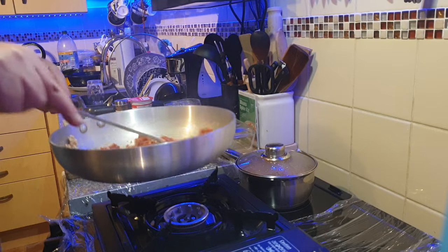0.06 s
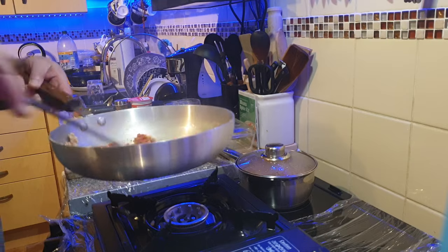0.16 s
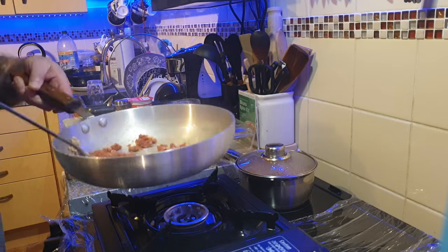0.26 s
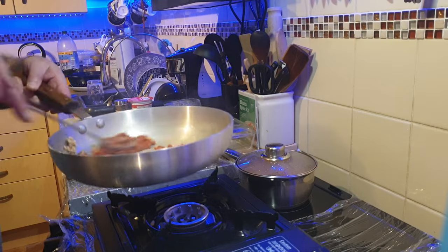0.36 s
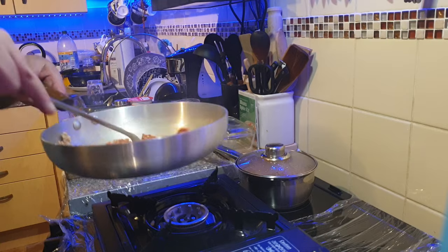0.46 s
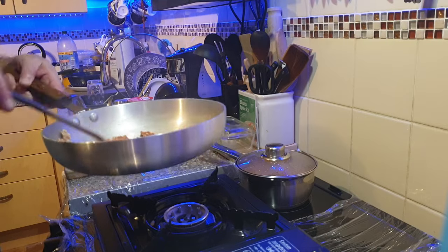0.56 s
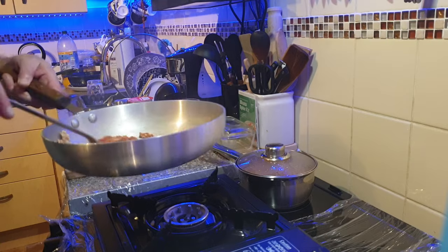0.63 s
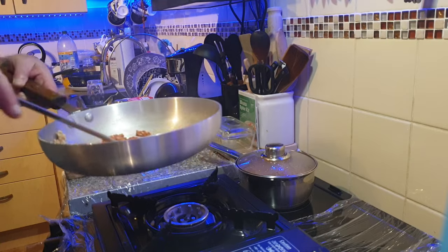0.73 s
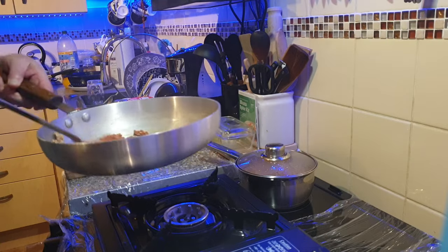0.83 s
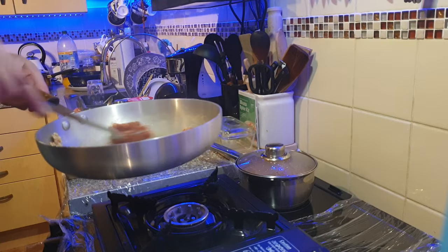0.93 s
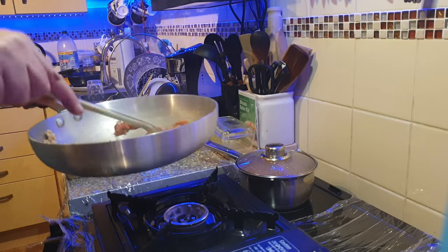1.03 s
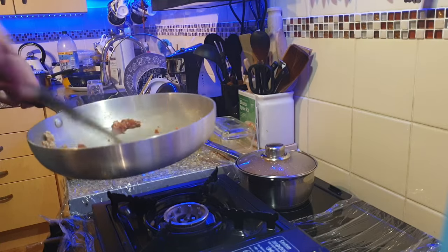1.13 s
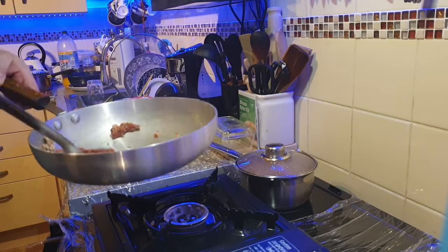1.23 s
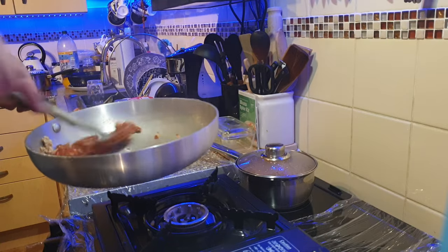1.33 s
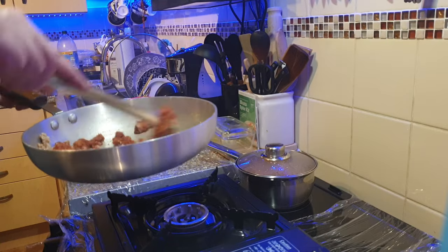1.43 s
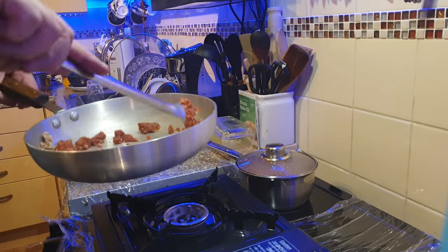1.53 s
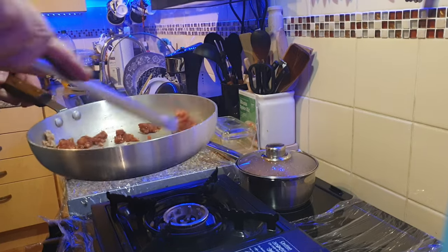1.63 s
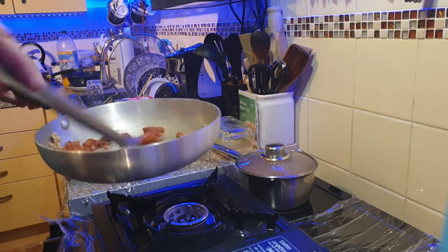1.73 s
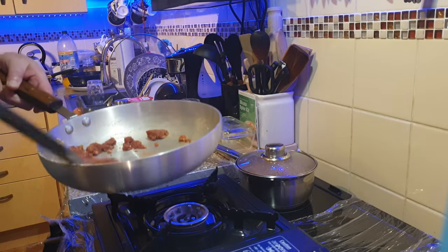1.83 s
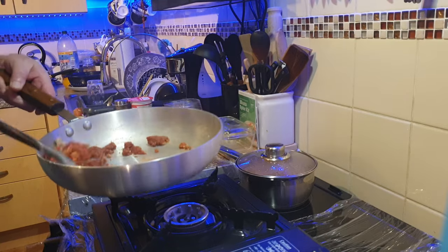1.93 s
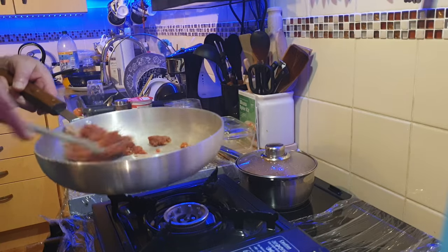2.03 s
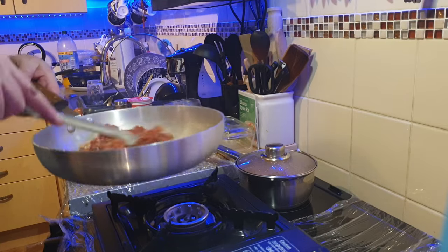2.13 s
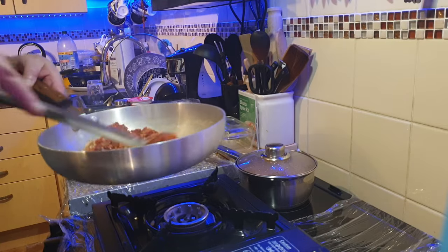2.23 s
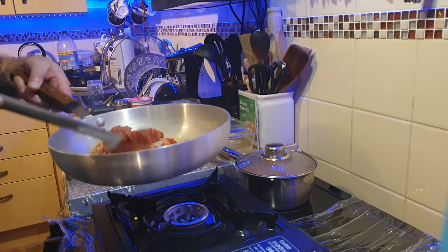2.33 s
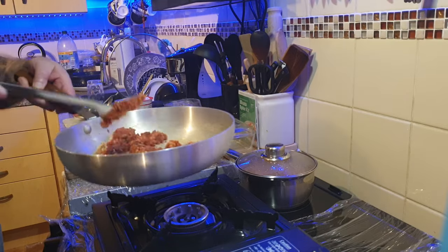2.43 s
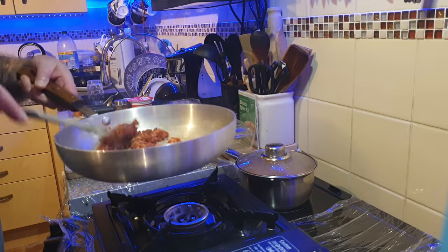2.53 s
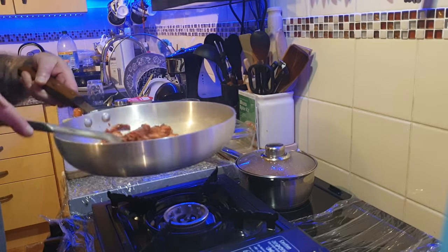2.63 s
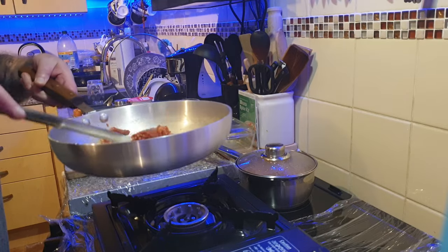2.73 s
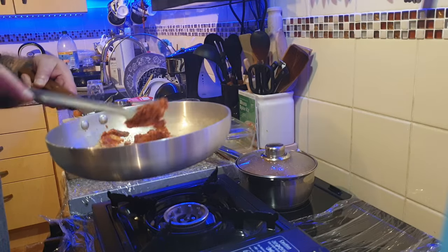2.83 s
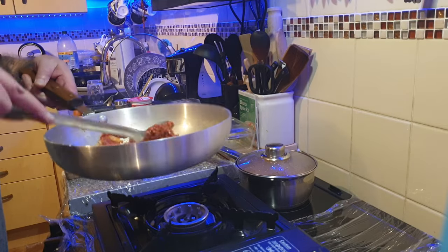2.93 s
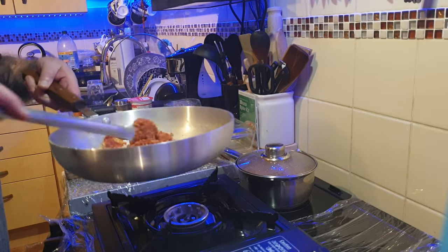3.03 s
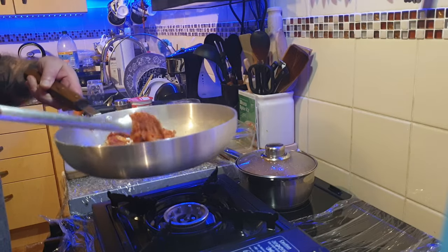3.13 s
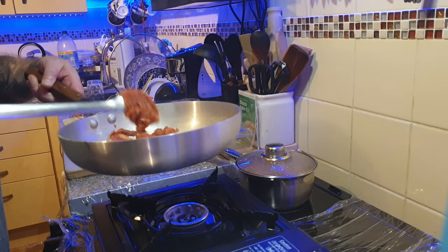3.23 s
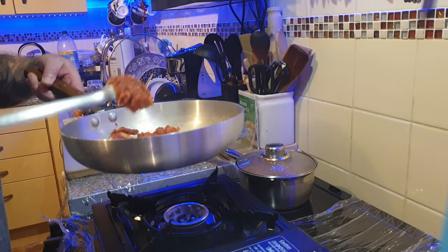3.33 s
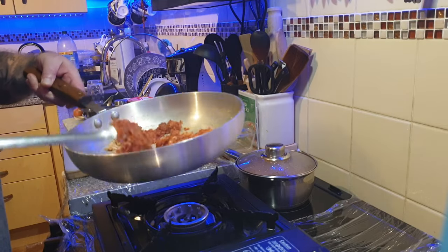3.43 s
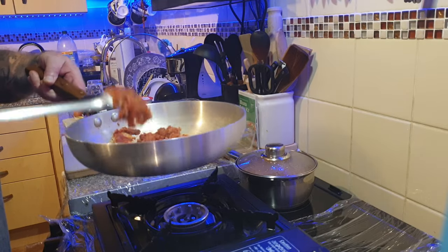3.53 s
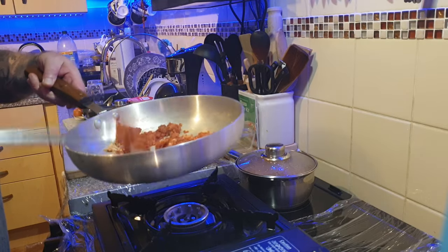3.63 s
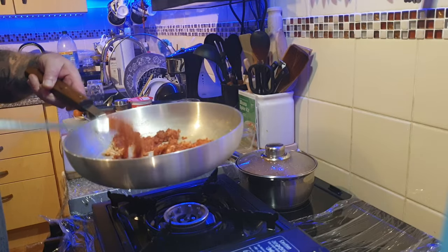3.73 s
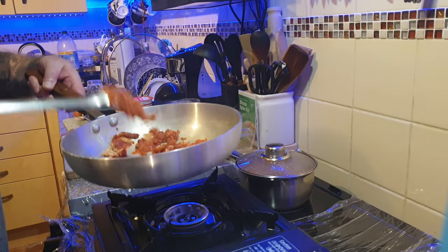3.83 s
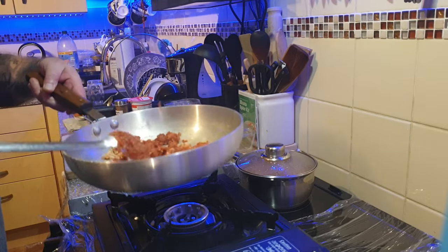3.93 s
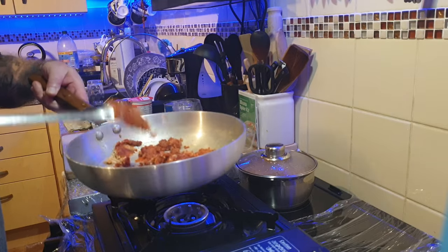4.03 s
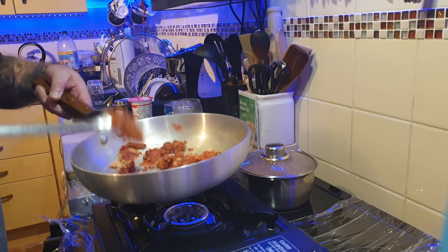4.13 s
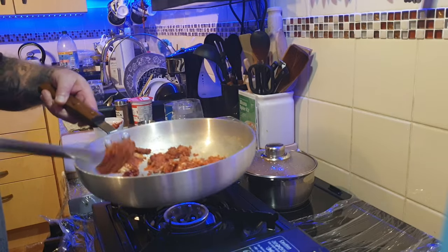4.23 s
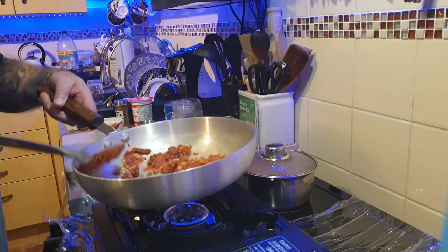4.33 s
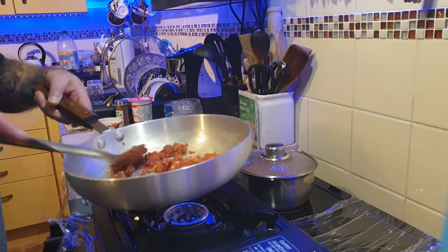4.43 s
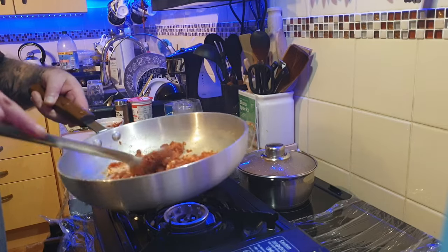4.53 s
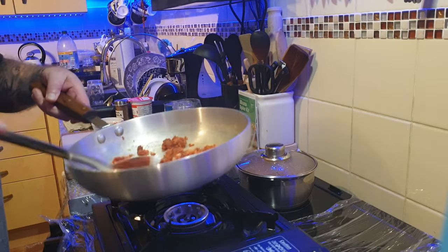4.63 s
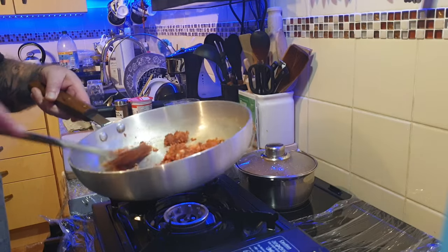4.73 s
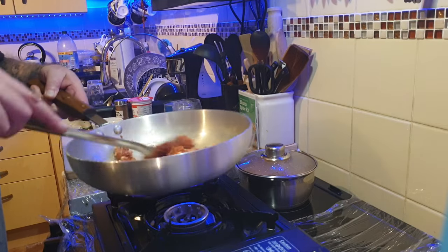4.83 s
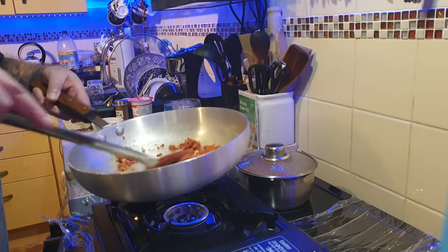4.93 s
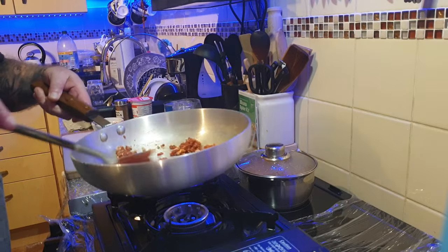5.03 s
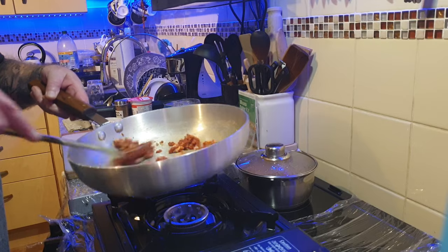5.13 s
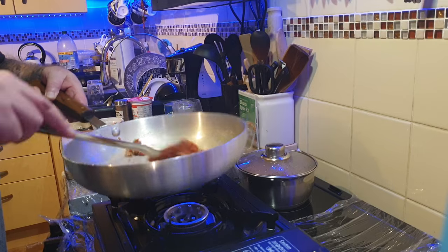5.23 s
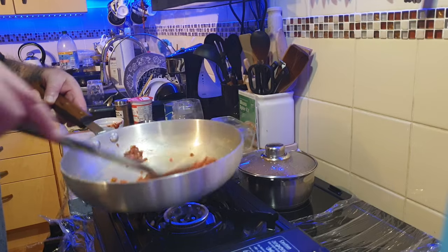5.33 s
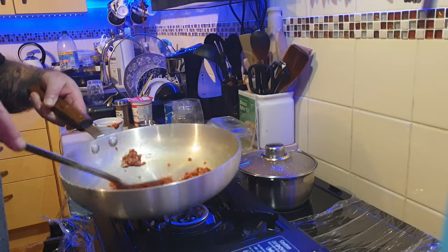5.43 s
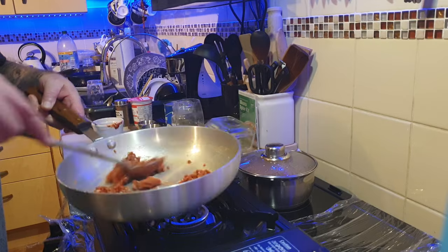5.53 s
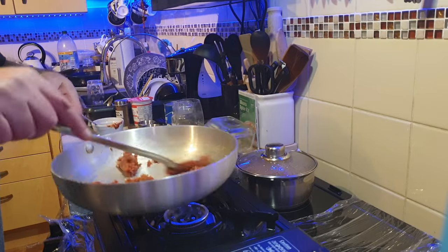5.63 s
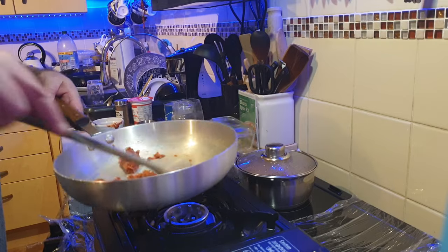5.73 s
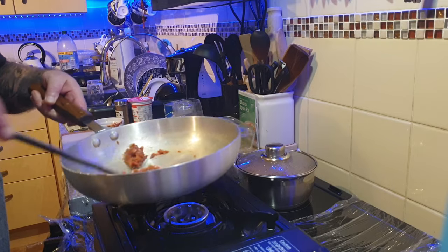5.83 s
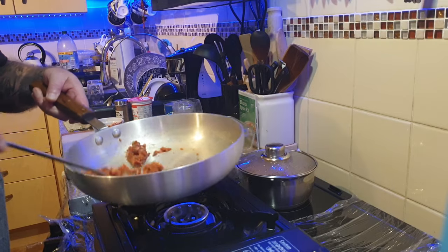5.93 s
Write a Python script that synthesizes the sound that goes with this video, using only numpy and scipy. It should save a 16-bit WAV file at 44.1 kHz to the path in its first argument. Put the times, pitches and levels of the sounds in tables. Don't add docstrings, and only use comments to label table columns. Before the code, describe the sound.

In a small tiled kitchen, paste sizzles finely in a metal pan above a softly roaring gas burner. A metal spoon scrapes and lightly clinks. Past the middle, three sharp ringing raps hit the rim, the loudest events; afterwards the background drops and stirring resumes more faintly. Close stereo microphone with short tile reflections.

```python
import sys
import numpy as np
from scipy import signal
from scipy.fft import rfft, irfft, next_fast_len
from scipy.io import wavfile
from scipy.ndimage import uniform_filter1d

SR = 44100
rng = np.random.default_rng(int(sys.argv[2]) if len(sys.argv) > 2 else 0)


def dump_mix(stems):
    frames = np.atleast_2d(stems).T
    limited = np.clip(frames, -1, 1)
    pcm = np.round(limited * 32767).astype(np.int16)
    wavfile.write(sys.argv[1], SR, pcm)


def elevation(decibels):
    levels = np.asarray(decibels, float)
    return 10 ** (levels / 20)


N = 263277
LEFT_LEAD = 4

MODE_HZ = np.array([285, 752, 840, 947, 1478, 1515, 1845, 2388, 2487, 2680, 2840, 2950, 3230, 3732, 3865, 3989, 4400, 4770, 5195, 5360, 5718, 5922, 6520, 6655, 7490, 8638, 8830, 9127, 10270, 11705])
# (first rap [dB], second rap [dB], third rap [dB])
MODE_DB = [(-15, -49, -47), (-20, -12, -13), (-9, -9, -11.5), (-32, -17, -20), (-7, -10, -8.5),
           (-4, -16, -22), (-9, -32, -25), (-36, -11, -3.5), (-6, -20, -25), (-12, -24, -11),
           (-3.5, -13, -11), (-19, -5.5, -20), (-22, -9, -29), (-25, -27, -9), (-16, -17, -13),
           (-32, -11, -13), (-31, -17, -32), (-9, -8, -10), (-15, -15, -23), (-1, -2, -13), (-23, -19, -7),
           (-15, -4, -8.5), (-8, -11, -16), (-16, -23, -5), (-27, -4.5, -5), (1, -28, -27), (-11, -20, -25),
           (1, -48, -25), (-26, -10, -5), (-28, -22, -11)]


def evened(x):
    return x / np.sqrt(np.mean(x ** 2) + 1e-20)


def read(points, hz):
    f, value = np.transpose(points)
    return np.interp(np.log(hz + 1), np.log(f + 1), value)


def follow(curve):
    s, level = np.transpose(curve)
    return np.interp(np.arange(N) / SR, s, level)


def add(mix, s, sound):
    part = mix[:, round(s * SR):][:, :sound.shape[1]]
    part += sound[:, :part.shape[1]]


def resonate(x, hz, width):
    radius = np.exp(-np.pi * width / SR)
    angle = 2 * np.pi * hz / SR
    poles = [1, -2 * radius * np.cos(angle), radius * radius]
    return signal.lfilter([1 - radius], poles, x) * 2 * np.sin(angle)


def noise(colour, count, size, patchy_db, flicker_db):
    # (frequency [Hz], coherence [-1 to 1])
    likeness = [(60, 0.91), (130, 0.95), (290, 0.79), (640, 0.82), (1410, 0.017), (3100, -0.31),
                (6820, 0.22), (15000, -0.029)]
    frames, hz = count * 4 // size + 5, np.fft.rfftfreq(size, 1 / SR)
    a, b, c, d, patches = rng.standard_normal((frames, len(hz), 5)).T
    patches = uniform_filter1d(patches, size // 64, 0)
    patches = evened(uniform_filter1d(patches, 8192 // size, 1))
    flicker = evened(uniform_filter1d(rng.standard_normal(frames), 3))
    same = np.clip(read(likeness, hz), -1, 1)[:, None]
    left, other = a + 1j * b, c + 1j * d
    z = np.array([left, same * left + np.sqrt(1 - same ** 2) * other])
    z *= elevation(read(colour, hz)[:, None] + patchy_db * patches + flicker_db * flicker)
    return evened(signal.istft(z, nperseg=size, noverlap=size * 3 // 4)[1][:, :count])


def ring(hz, db, t60, rise):
    t = np.arange(round(SR * min(np.max(t60), 1 / 4))) / SR
    chance = rng.random((len(hz), 4, 1))
    hz, db, t60 = (np.asarray(v)[:, None, None] for v in (hz, db, t60))
    turn = np.minimum(hz / 1500, 1) * np.sign(chance[:, 1:2] - .5) / 4
    phase = chance[:, :1] + np.array([[0], [1]]) * (hz * LEFT_LEAD / SR + turn)
    beat = 1 + .5 * np.cos(2 * np.pi * (0.011 * hz * chance[:, 2:3] * t + chance[:, 2:]))
    modes = elevation(db - 60 * t / t60) * beat * np.sin(2 * np.pi * (hz * t + phase))
    return modes.sum(0) * (1 - np.exp(-t / rise))


def burst(colour, t60, rise):
    t = np.arange(round(SR / 3)) / SR
    clatter = noise(colour, len(t), size=1024, patchy_db=1.5, flicker_db=0)
    return clatter * elevation(-60 * t / t60) * (1 - np.exp(-t / rise))


def clustered(colour, width, depth_db):
    hz = np.geomspace(100, 16000, num=400)
    apart = np.abs(hz[:, None] - MODE_HZ).min(1) / (width * hz)
    dip_db = depth_db * (1 - np.exp(-apart ** 2)) * (hz > 2000) * (hz < 12500)
    return np.c_[hz, read(colour, hz) - dip_db]


def fridge_hum():
    # (start frequency [Hz], end frequency [Hz], level [dB])
    tones = [(100, 100, -59), (346.1, 349.7, -56.5)]
    hum = np.zeros(N)
    for hz, end_hz, db in tones:
        turns = np.cumsum(np.linspace(hz, end_hz, N)) / SR
        hum += elevation(db + 5.5) * np.sin(2 * np.pi * turns)
    return hum


def burner():
    # (frequency [Hz], density [dB per Hz])
    roar_colour = [(20, -56), (40, -34), (64, -2), (90, -6), (112, 3), (170, -10), (215, -6.5), (272, -1),
                   (295, -5), (312, -42), (340, -9), (400, 1), (500, -8), (650, -21), (900, -50)]
    # (frequency [Hz], density [dB per Hz])
    gas_colour = [(320, -29), (550, -4.5), (826, 4.5), (913, -1), (1700, -2.5), (2020, -4.5), (2160, -11),
                  (2350, -8.5), (2970, 3.5), (3500, -10.5), (4000, -14), (5200, -32), (8800, -120)]
    roar = elevation(-51) * noise(roar_colour, N, size=4096, patchy_db=1.5, flicker_db=-0.5)
    gas = elevation(-54.5) * noise(gas_colour, N, size=1024, patchy_db=0.2, flicker_db=0.1)
    return roar + gas


def strokes():
    # (most pressure [s], release [s], pressure [dB], place [0 = flat bottom to 1 = wall])
    spoon_strokes = [(0.005, 0.06, -35, 0.26), (0.05, .05, -32.5, .55), (0.25, 0.098, -40, .45),
                     (0.44, 0.13, -34, 0.74), (0.51, .04, -40, .95), (0.54, .04, -37, .1),
                     (0.62, .08, -36, 0.66), (0.99, 0.12, -40.5, 1), (1.055, 0.08, -33, .1),
                     (1.2, 0.061, -39, 0.5), (1.32, 0.12, -33, 0.18), (1.7, 0.058, -30.5, .05),
                     (1.74, 0.08, -38.5, 1.0), (1.79, .04, -33, .05), (1.865, 0.072, -26, 0.28),
                     (2.21, 0.067, -41, 0.74), (2.25, 0.11, -34.5, .05), (2.27, 0.053, -35.5, 0.66),
                     (2.691, 0.039, -27.5, 0.77), (2.76, 0.06, -29, 0.23), (3.1, 0.18, -38.5, 0.84),
                     (4.138, 0.083, -39, 0.76), (4.477, 0.022, -22.5, 1.0), (4.585, 0.077, -33, 1.0),
                     (4.735, 0.067, -26, 0.52), (4.947, 0.057, -31, 0.74), (5.193, .04, -35, 0.87),
                     (5.283, 0.14, -34, 0.23), (5.545, 0.13, -29.5, 0.36), (5.699, 0.075, -32.5, .2)]
    groups_db = [-12.5, -10, 2.5]
    idle_db = [-64.5, -75, -46]
    press_share, lift_db = 1.36, 19
    off_place_db = 19
    t = np.arange(0, N + 64, 64) / SR
    s, release, db, place = np.transpose(spoon_strokes)[:, :, None]
    away = np.maximum((t - s) / release, (s - t) / (press_share * release))
    felt = []
    for k, (group_db, rest_db) in enumerate(zip(groups_db, idle_db)):
        stroke_db = db + group_db - off_place_db * abs(place - k / 2) - lift_db * away
        power = elevation(rest_db) ** 2 + (elevation(stroke_db) ** 2).sum(0)
        felt.append(np.interp(np.arange(N) / SR, t, np.sqrt(power)))
    return felt


def sizzle():
    # (time [s], level [dB])
    frying = [(0.0, -30), (0.24, -35), (0.32, -31.5), (0.83, -36.5), (0.94, -34), (1.18, -36.5),
              (1.38, -33), (1.52, -37), (1.96, -33.5), (2.12, -34), (2.27, -40.5), (2.39, -37.5),
              (3.41, -38.5), (4.38, -38.5), (4.7, -36), (5.08, -39), (5.47, -35.5), (5.97, -38)]
    # (frequency [Hz], density [dB per Hz])
    fizz_colour = [(290, -44), (500, -24), (648, -16.5), (760, -17), (971, -17), (2000, -11), (2150, -18.5),
                   (2340, -9), (3820, -10), (6420, -4), (8090, -6), (10800, 0.5), (15700, -1.5)]
    stir_db = -2
    pop_size = elevation(2.5 * np.minimum(rng.exponential(1, (2, N)), 5))
    pops = pop_size * (rng.random((2, N)) < 500 / SR)
    grain = signal.lfilter([1], [1, -.95], pops, axis=1)
    fizz = noise(fizz_colour, N, size=512, patchy_db=1.0, flicker_db=.3) * (1 + .15 * grain)
    return np.hypot(elevation(follow(frying) + 5.0), elevation(stir_db) * strokes()[2]) * evened(fizz)


def scraping():
    # (frequency [Hz], width [Hz], level [dB])
    rubbed = [(757, 27, -10), (848.6, 18, -2), (1552, 83, 3.5), (1780, 34, -1.5), (2389, 47, -2.5),
              (2840, 29, -4), (3520, 56, -1), (3745, 62, -1), (4840, 94, -6), (5340, 51, -1.5),
              (5700, 10, 2), (5870, 41, 0), (6343, 51, 7.5), (6590, 11, -0.5), (7400, 26, -32),
              (7300, 42, -40), (8140, 58, -6), (8780, 140, -1)]
    unevenness = evened(uniform_filter1d(rng.standard_normal(N), 300))
    jerks = rng.standard_normal((2, N)) * elevation(2.5 * unevenness)
    jerks[1] = .8 * jerks[0] + .6 * jerks[1]
    groups = np.zeros((3, 2, N))
    for hz, width, db in rubbed:
        group = np.searchsorted([1200, 2100], hz)
        groups[group] += elevation(db) * resonate(jerks, hz, width) / np.sqrt(width)
    return sum(pressure * evened(g) for g, pressure in zip(groups, strokes()))


def taps():
    # (time [s], peak [dB], spot frequency [Hz], t60 [s], clatter under the peak [dB])
    light_taps = [(0.039, -31.5, 854, 0.25, -7.5), (0.129, -34.5, 847, 0.29, -6),
                  (0.234, -33.5, 850.5, 0.33, -2.5), (0.419, -32.5, 1534, 0.13, -5),
                  (0.529, -30, 863, 0.14, -27), (1.179, -29, 855, 0.19, -6),
                  (1.755, -16.5, 2840, 0.12, -14.5), (1.86, -20, 829, 0.093, -14),
                  (2.109, -23, 3580, 0.082, -13), (2.67, -17, 627, 0.042, -13),
                  (2.684, -24.5, 3890, 0.29, -3), (4.388, -27, 700, 0.06, -5.5),
                  (4.454, -34.5, 2590, 0.14, 0), (4.565, -39, 6300, 0.17, 0),
                  (4.719, -28.5, 2492, 0.16, -13), (4.832, -44, 3630, 0.2, -2.5),
                  (5.18, -42, 2380, 0.22, -2), (5.288, -39, 853, 0.14, -2.5), (5.525, -31, 902, 0.097, -5),
                  (5.925, -25.5, 1514, 0.1, -2)]
    # (frequency [Hz], density [dB per Hz])
    touch_colour = [(240, -48), (400, -23), (798, 0), (990, -15.5), (1520, -2.5), (1690, -8.5), (2600, 3.5),
                    (4390, -7), (5610, 1.5), (6350, -5), (15700, -10.5)]
    # (frequency [Hz], level [dB], t60 [s])
    grate_modes = [(1480, 1, 0.031), (1857, -1.5, 0.17), (2486, -4.5, .12), (1010, -12, 0.033),
                   (587, -9.5, 0.042)]
    body_db = -32
    out = np.zeros((2, N))
    body_hz, usual_db = MODE_HZ[::2], np.mean(MODE_DB, 1)[::2]
    for s, peak_db, spot_hz, t60, clatter_db in light_taps:
        spot = ring([spot_hz, MODE_HZ[0]], [peak_db - 8.5, peak_db + body_db], [t60, .2], rise=0.0018)
        add(out, s, spot)
        add(out, s, elevation(peak_db + clatter_db - 0.5) * burst(touch_colour, t60, rise=0.00054))
        whole_db = usual_db + peak_db + clatter_db - 7.5
        add(out, s, ring(body_hz, whole_db, t60 + 0 * body_hz, rise=0.0025))
    add(out, 4.3875, elevation(-29.5) * ring(*np.transpose(grate_modes), rise=0.00054))
    return out


def raps():
    # (time [s], ring [dB], t60 [s], tick [dB])
    rim_raps = [
        (3.441, -14.5, 0.099, -6),
        (3.703, -12.5, 0.16, -8.5),
        (3.9478, -11.5, 0.14, -12),
    ]
    # (frequency [Hz], density [dB per Hz])
    clatter_colours = [
        [(120, -57), (200, -45), (273, -26), (692, -11), (846, -12), (927, -16), (1520, -10.5), (2310, -12.5),
         (2930, -14), (3510, -31), (3710, -14.5), (8920, -10), (15700, -27)],
        [(120, -69), (200, -45), (655, -39), (846, -0.5), (1220, -15.5), (1520, -11), (1850, -14.5),
         (2820, 2.5), (3150, -7.5), (5350, -1.5), (8140, -12), (10500, -7), (15700, -32)],
        [(120, -64), (200, -35), (655, -30), (862, 1), (1260, -18.5), (1490, -9), (1850, -16.5), (2310, 0),
         (3270, -7.5), (3780, -3.5), (5860, -5), (7990, -7.5), (15700, -29)],
    ]
    # (frequency [Hz], level over the tick [dB], t60 [s])
    bowl_modes = [(700, -11.5, 0.021), (2410, -5.5, 0.031), (2630, -1, 0.036), (2845, -5.5, 0.044)]
    clatter_db, thump_db = 0.7, -23
    out = np.zeros((2, N))
    for (s, ring_db, t60, tick_db), db, colour in zip(rim_raps, np.transpose(MODE_DB), clatter_colours):
        colour = clustered(colour, width=.02, depth_db=9.0)
        mode_t60 = t60 * (MODE_HZ / 3000) ** -.15
        add(out, s, elevation(ring_db) * ring(MODE_HZ, db, mode_t60, rise=0.0014))
        add(out, s, elevation(ring_db + clatter_db) * burst(colour, 1.13 * t60, rise=0.0016))
        add(out, s, elevation(tick_db) * burst(colour, 0.047, rise=0.00014))
        add(out, s, elevation(tick_db) * ring(*np.transpose(bowl_modes), rise=0.00048))
        add(out, s, elevation(ring_db) * ring([58, 105], [thump_db, thump_db - 3], [.15, .1], rise=0.011))
    return out


def kitchen(x):
    count = 600
    at = 300 + 20 * np.arange(count) + rng.integers(0, 20, (2, count))
    tail = np.zeros((2, at.max() + 1))
    echoes = rng.choice([-1., 1.], at.shape) * elevation(-60 * at / SR / 0.16)
    np.put_along_axis(tail, at, echoes, 1)
    return signal.oaconvolve(x, tail / np.linalg.norm(tail[0]), axes=1)[:, :N]


def scene():
    # (time [s], level [dB])
    gain = [
        (0, -1),
        (3.44, 1.5),
        (3.47, -1.5),
        (3.7, -2.6),
        (3.73, -8.5),
        (4.1, -10.5),
        (5.97, -9.5),
    ]
    steady = fridge_hum() + burner() + sizzle() + scraping()
    metal = taps() + raps()
    return metal + elevation(-9.5) * kitchen(metal) + elevation(follow(gain)) * steady


def roll_off(x):
    return signal.sosfilt(signal.butter(12, 17000, fs=SR, output="sos"), x)


def record(dry):
    # (frequency [Hz], left minus right [dB])
    left_right = [(60, -2), (110, -2), (200, -1.5), (380, -0.5), (700, -2), (1290, -3), (2380, 1),
                  (4400, -9.5), (8120, -3.5), (15000, -3.5)]
    power_db = 10 * np.log10(abs(uniform_filter1d((dry ** 2).mean(0), 130)) + 1e-12)
    fall = np.arange(N) * 280.0 / SR
    over_db = np.maximum(np.maximum.accumulate(power_db + fall) - fall + 13, 0)
    limited = dry / elevation(0.23 * over_db)
    limited = .95 * np.tanh(limited / .95)
    size = next_fast_len(N)
    hz = np.fft.rfftfreq(size, 1 / SR)
    lean = elevation(read(left_right, hz) / 2) * np.exp(1j * np.pi * hz * LEFT_LEAD / SR)
    band = (hz < 15750) * hz ** 2 / (hz ** 2 + 30 ** 2)
    mix = irfft(rfft(limited, size) * np.array([lean, 1 / lean]) * band, size)[:, :N]
    return roll_off(mix)


dry = scene()
out = record(dry)
dump_mix(out)
```